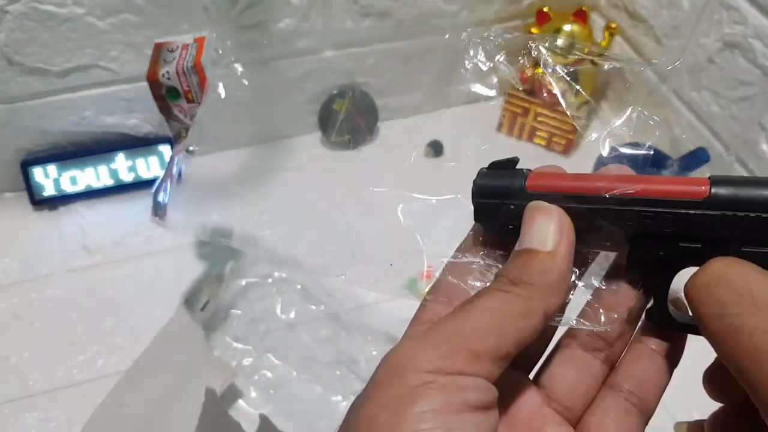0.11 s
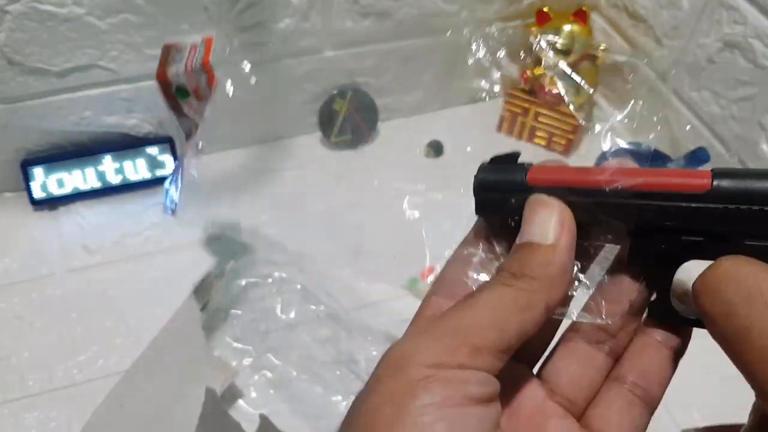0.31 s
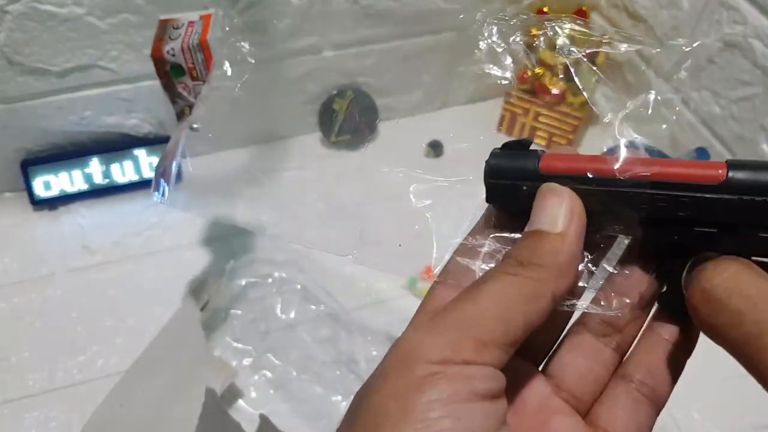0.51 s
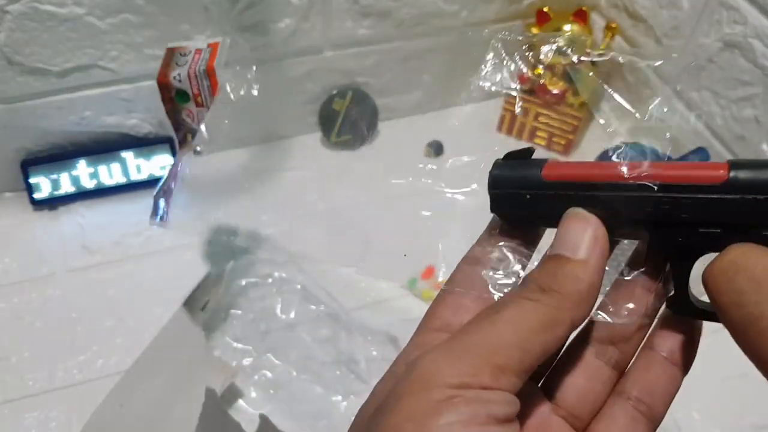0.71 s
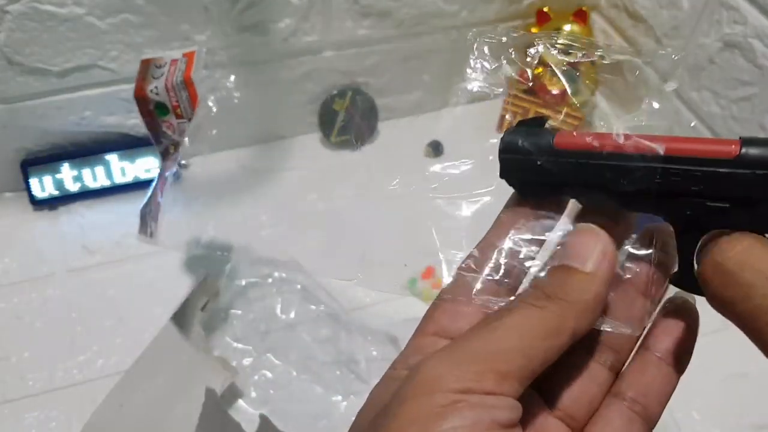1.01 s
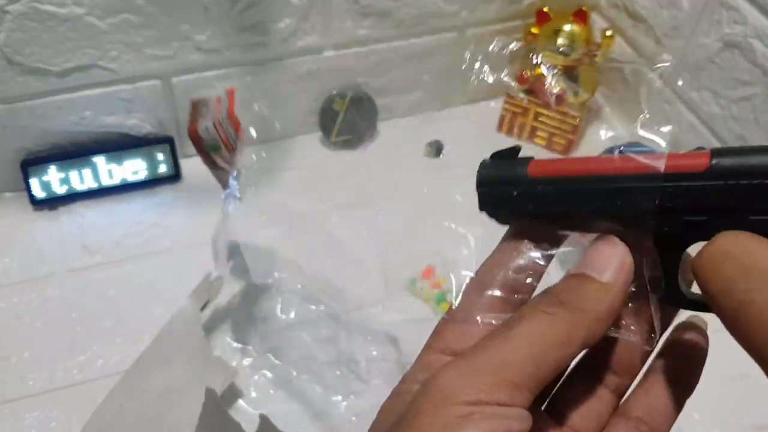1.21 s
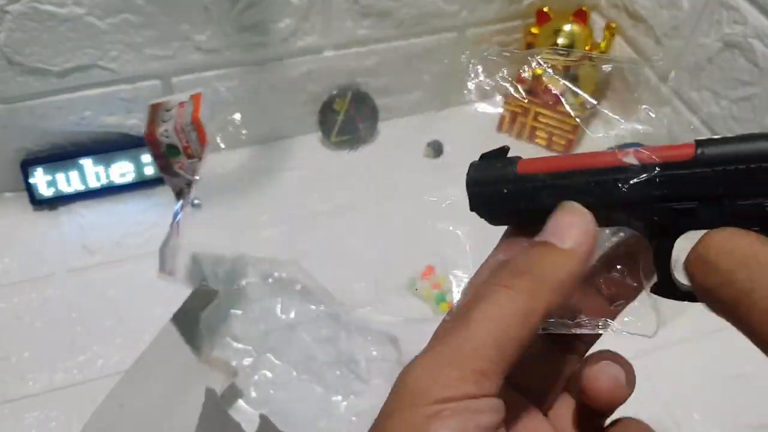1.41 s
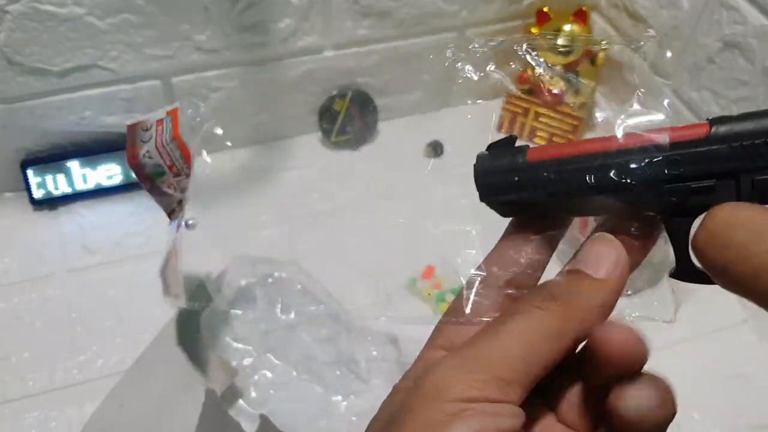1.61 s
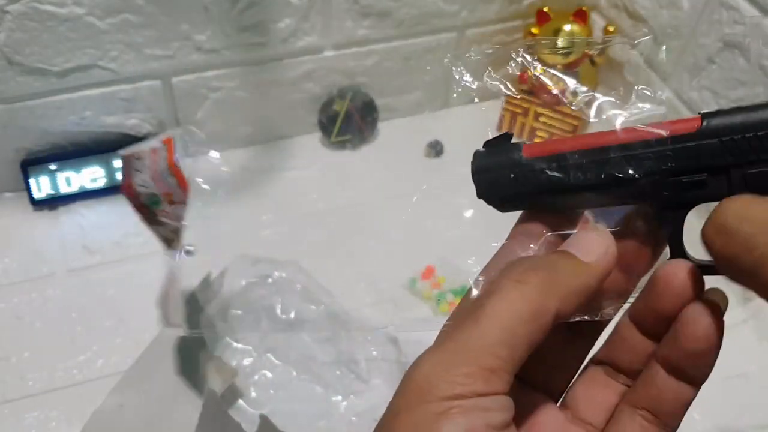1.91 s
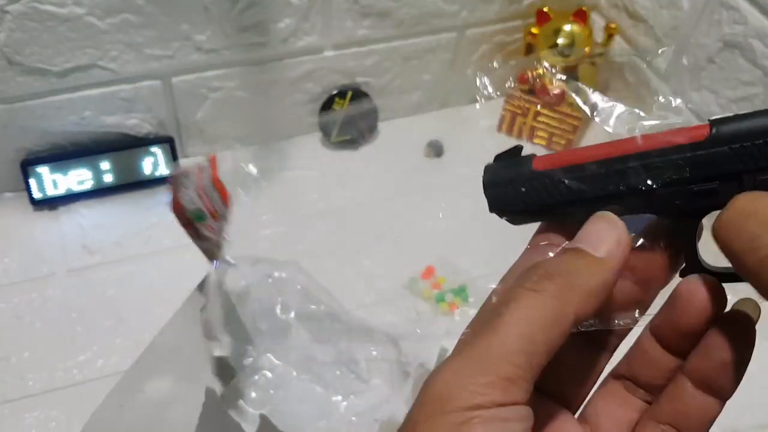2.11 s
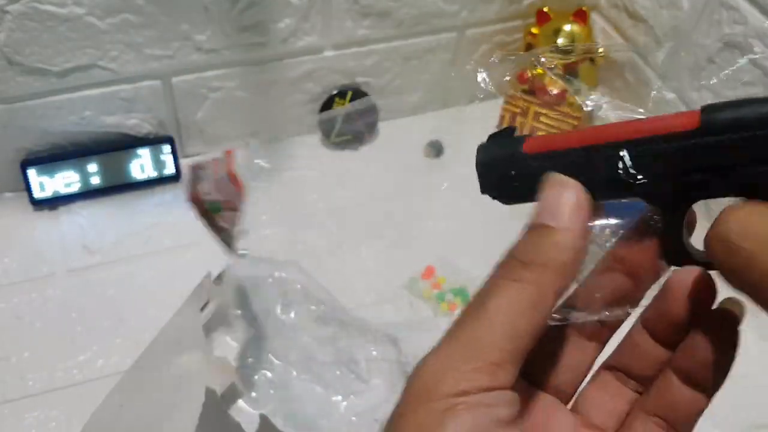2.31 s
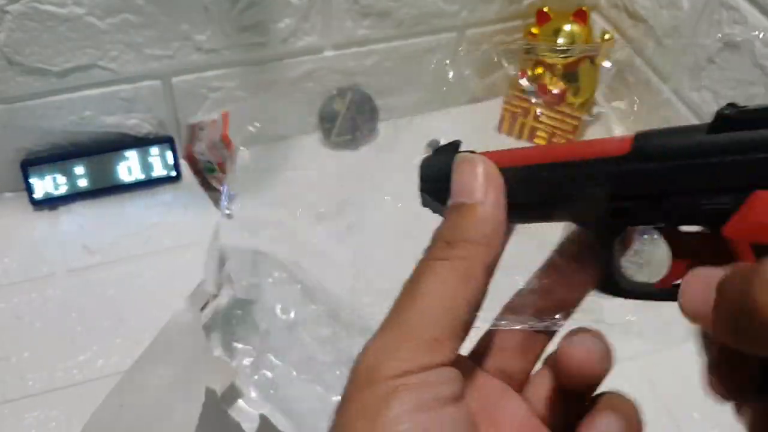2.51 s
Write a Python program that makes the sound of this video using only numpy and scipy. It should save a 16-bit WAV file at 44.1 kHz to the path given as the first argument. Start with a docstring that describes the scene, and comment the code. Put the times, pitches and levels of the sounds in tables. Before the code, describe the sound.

A toy pistol clicks sharply five times, with thin plastic film crinkling in between.

```python
"""Toy pistol, dry-fired in a small room

A small hard-walled room, a phone's two microphones close to a plastic toy pistol. Five pulls: each
releases a sprung striker whose crack briefly overloads the microphones, heard as a low thump,
and the trigger snaps back a moment later. In between, thin plastic film crinkles in the hand and
fingers knock on the shell, over a hush with a faint hum."""
import sys
import numpy as np
from scipy import signal
from scipy.fft import rfft, irfft, next_fast_len
from scipy.io import wavfile
from scipy.ndimage import uniform_filter1d, minimum_filter1d

SR = 44100
rng = np.random.default_rng(int(sys.argv[2]) if len(sys.argv) > 2 else 0)


def store_wav(level_fs):
    """Save 16-bit WAV to argv[1]."""
    pcm = np.round(np.clip(np.atleast_2d(level_fs), -1, 1) * 32767)
    wavfile.write(sys.argv[1], SR, pcm.T.astype(np.int16))


N = 119070

# modes of the plastic shell: f/Hz, t60/s, level/dB for striker, for trigger, for rub, left minus right/dB
SHELL_MODES = [(610, .017, -9, -10, -12, 5), (900, .015, -14, -11, -12, 3), (1560, .03, -2, 1, -1, 4),
               (2085, .027, 2, 1, 3, 5), (2270, .025, -4, -6, -8, 1), (2648, .033, -1, 4, -4, 0),
               (3180, .016, -1, -11, -8, -2), (3650, .014, -3, -7, -12, 3), (4250, .016, 0, -9, -12, 2),
               (5250, .018, 0, -10, -16, 0), (6300, .014, -3, -11, -20, 2), (7630, .014, -4, -20, -24, 2),
               (9600, .012, -3, -16, -26, 2), (10500, .012, -3, -20, -26, 2)]
BY_STRIKER, BY_TRIGGER, BY_RUB = 2, 3, 4  # its level columns
LEFT_LAG_SAMPLES = 7  # the pistol is nearer the right microphone
CLOSE_LIKENESS = 0.2  # left-right correlation of close noises
FILM_PAN_DB, LEAD_IN_S = 2, .005


def amp(db):
    return 10 ** (np.asarray(db) / 20)


def unit_rms(x):
    return x / np.sqrt(np.mean(x ** 2) + 1e-20)


def at_hz(points, hz):
    f, value = np.transpose(points)
    return np.interp(np.log(hz + 1), np.log(f + 1), value)


def over_time(points):
    t, value = np.transpose(points)
    return np.interp(np.arange(N) / SR, t, value)


def add(mix, s, sound):
    at = max(round(s * SR), 0)
    part = mix[..., at:at + sound.shape[-1]]
    part += sound[..., :part.shape[-1]]


def colour(x, db_of):
    """Filters by a gain in dB given as a function of Hz."""
    size = next_fast_len(x.shape[-1] + 2048)
    gain = amp(db_of(np.fft.rfftfreq(size, 1 / SR)))
    return irfft(rfft(x, size) * gain, size)[..., :x.shape[-1]]


def noise_pair(size, likeness=CLOSE_LIKENESS):
    """Left and right noises that share a part."""
    a, b = rng.standard_normal((2, size))
    return np.array([a, likeness * a + np.sqrt(1 - likeness ** 2) * b])


def pan(left_db):
    return amp(np.array([[left_db / 2], [-left_db / 2]]))


def room_tone():
    """A steady hush with a faint fuzzy hum, over a low rumble that sinks and comes back."""
    spectrum = [(12, -44), (20, -10), (91, 9), (216, -21.5), (248, -14.5), (485, -20), (718, -19.5),
                (873, -26.5), (2460, -16), (2820, -21), (3250, -20), (16000, -57.5)]  # the room's hush: f/Hz, level/dB
    likeness = [(60, 1), (240, 0.87), (950, 0.93), (3770, 0.045), (15000, 0.02)]  # how alike the microphones hear it: f/Hz, correlation
    balance = [(60, -4), (380, 4), (2380, 2.5), (15000, 1)]  # its lean to one side: f/Hz, left minus right/dB
    rumble_levels = [(0.0, -56), (0.14, -56), (0.46, -62), (0.82, -67), (1.01, -69.5), (1.59, -71.5),
                     (1.87, -71), (2.7, -63)]  # course of the rumble: t/s, level/dB
    size = next_fast_len(N)
    hz = np.fft.rfftfreq(size, 1 / SR)
    a, b = rfft(rng.standard_normal((2, size)))
    same, lean = at_hz(likeness, hz), amp(at_hz(balance, hz) / 2)
    air = np.array([a * lean, (same * a + np.sqrt(1 - same ** 2) * b) / lean])
    hum_db = 7 * np.exp(-.5 * ((hz - 487) / 9) ** 2)
    air *= amp(at_hz(spectrum, hz) + hum_db)
    lows = 1 / (1 + (hz / 220) ** 4)
    air_rms = np.sqrt(np.mean(irfft(air, size) ** 2))
    hush = amp(-47) * irfft(air * (1 - lows), size)[:, :N] / air_rms
    rumble = amp(over_time(rumble_levels)) * unit_rms(irfft(air * lows, size)[:, :N])
    return hush + rumble


def reflections(send):
    """Hard walls return a dense tail, coloured by the shell's modes; each band dies at its own speed."""
    decay = [(200, 0.37), (600, 0.21), (1500, 0.34), (4000, 0.29), (9000, 0.31), (14000, 0.31)]  # reverberation time: f/Hz, t60/s
    spectrum = [(60, -32), (150, -20), (700, -13.5), (1400, -7.5), (2500, -3), (4500, -3), (7000, -7),
                (11000, -9.5), (15500, -14)]  # colour of the tail: f/Hz, level/dB
    build_s, far_wall_s, wall_fade_s = .0048, .017, .0032
    out = np.zeros((2, N))
    turn = np.arange(N) * 7 // SR % 3  # three tails take turns, 1/7 s each
    for k in range(3):
        hz, t, bands = signal.stft(noise_pair(SR // 2, likeness=.067), SR, nperseg=512, noverlap=448)
        humps = sum(np.exp(-.5 * (np.log((hz + 1) / mode[0]) / .03) ** 2) for mode in SHELL_MODES)
        start_db = at_hz(spectrum, hz) + 3.5 * humps
        bands = bands * amp(start_db[:, None] - 60 * t / at_hz(decay, hz)[:, None])
        tail = signal.istft(bands, SR, nperseg=512, noverlap=448)[1]
        t = np.arange(tail.shape[1]) / SR
        far_wall = .73 * (t > far_wall_s) * np.exp(-(t - far_wall_s) / wall_fade_s)
        tail *= np.minimum(t / build_s, 1) ** 2 + far_wall
        tail /= 3 * abs(tail[:, :1000]).mean()
        out += signal.fftconvolve((send * (turn == k))[None], tail, axes=1)[:, :N]
    return out * pan(1.9)


def film_rustle():
    """Many tiny creases of uneven size give way under the fingers."""
    handling = [(0.0, -54), (0.13, -52), (0.4, -62), (0.54, -109), (0.73, -57), (0.85, -38.5), (1.16, -73),
                (1.41, -68), (1.62, -44.5), (1.87, -72), (2.01, -39.5), (2.22, -91), (2.36, -42),
                (2.7, -44)]  # how hard the film is worked: t/s, level/dB
    spectrum = [(120, -10), (200, -16), (322, 4), (519, -55), (683, -2), (1500, -7), (1680, -5),
                (9930, -18.5), (14900, -50), (16000, -7)]  # colour of the rustle: f/Hz, level/dB
    creases_per_s, grain_s, spread_db = 350, .0091, 5.5
    sizes = amp(spread_db * np.minimum(rng.exponential(1, N), 4))
    creases = sizes * (rng.random(N) < creases_per_s / SR)
    power = signal.lfilter([1], [1, -np.exp(-2 / (grain_s * SR))], creases ** 2)
    hiss = colour(noise_pair(N), lambda hz: at_hz(spectrum, hz))
    return pan(FILM_PAN_DB) * amp(over_time(handling) - 6) * unit_rms(hiss * np.sqrt(abs(power)))


def film_crinkles():
    """Creases snap as dying bursts with a broad peak and a wide spray; returns direct sound, room send."""
    snaps = [(0.107, -46.5, 1400, 0.0029), (0.408, -34, 2080, 0.0087), (0.4155, -34, 1890, 0.0019),
             (0.437, -47, 2020, 0.0054), (0.63, -43, 2400, 0.0036), (0.636, -61, 1300, 0.0022),
             (0.66, -62, 1800, 0.0018), (0.669, -50, 3950, 0.002), (0.678, -46, 1760, 0.0039),
             (0.7153, -39, 1500, 0.0033), (0.718, -36, 1770, 0.0058), (0.731, -46, 1800, 0.008),
             (0.737, -57, 2000, 0.0026), (0.765, -34, 1570, 0.00037), (0.777, -37, 2400, 0.0014),
             (0.798, -41.5, 3470, 0.0024), (0.93, -37, 2980, 0.0056), (0.98, -43.5, 1530, 0.0016),
             (1.065, -41.5, 2760, 0.0067), (1.08, -43, 3000, 0.0025), (1.154, -37, 2450, 0.0015),
             (1.166, -39.0, 1660, 0.0022), (1.1916, -41, 2220, 0.013), (1.21, -44, 2470, 0.023),
             (1.2215, -29.5, 1700, 0.00088), (1.2356, -41, 3870, 0.011), (1.248, -34.5, 1400, 0.0027),
             (1.267, -44.5, 1380, 0.0074), (1.292, -49, 4000, 0.0016), (1.4656, -41, 3050, 0.0039),
             (1.5824, -42.5, 1330, 0.025), (1.591, -34.5, 2150, 0.0076), (1.602, -40, 1730, 0.0028),
             (1.649, -40, 1740, 0.0023), (1.676, -40.5, 1200, 0.0021), (1.7095, -41, 2200, 0.012),
             (1.7316, -42, 1540, 0.016), (1.7442, -30, 2440, 0.0012), (1.78, -39, 1640, 0.0085),
             (1.798, -39.5, 2250, 0.0033), (1.934, -32, 1850, 0.0027), (2.116, -45.5, 2980, 0.0034),
             (2.141, -40.5, 2030, 0.0075), (2.166, -38, 1710, 0.0021), (2.327, -38.5, 695, 0.0045),
             (2.474, -45, 1230, 0.008), (2.486, -41.5, 2440, 0.0081), (2.503, -39, 2000, 0.0067),
             (2.558, -32.5, 1190, 0.0004), (2.572, -39.5, 1740, 0.0028), (2.581, -36.5, 4260, 0.0034),
             (2.612, -43, 740, 0.0018), (2.6268, -41, 1000, 0.018), (2.639, -36.5, 1820, 0.0076),
             (2.65, -33, 1240, 0.0051), (2.662, -32, 1240, 0.0033), (2.692, -36.5, 1820, 0.0017)]  # single creases: t/s, level/dB, centre f/Hz, decay/s
    near, send, t = np.zeros((2, N)), np.zeros(N), np.arange(1500) / SR
    for s, db, centre_hz, decay_s in snaps:
        reach_hz = 5000 * amp((db + 38) * .74)  # harder creases reach higher

        def spectrum_db(hz):
            peak = np.exp(-np.log2((hz + 1) / centre_hz) ** 2)
            spray = (amp(-5.5) * hz / (hz + 600)) ** 2 / (1 + (hz / reach_hz) ** 2)
            return 10 * np.log10(peak + spray + 1e-9)

        burst = unit_rms(colour(noise_pair(len(t)), spectrum_db)) * np.exp(-t / max(decay_s, .0005))
        add(near, s, pan(FILM_PAN_DB) * amp(db) * burst)
        add(send, s, amp(db - 20.5) * np.ones(1))
    return near, send


def finger_knocks():
    """Fingers bump the shell: soft-edged, quickly damped low tones."""
    knocks = [(0.41, -52, 274), (0.717, -33.5, 286), (0.927, -40, 312), (1.588, -48, 262),
              (1.954, -29.5, 288), (2.028, -40, 440), (2.148, -42, 260), (2.431, -30, 312),
              (2.61, -27.5, 330), (2.647, -26, 267), (2.662, -31, 426)]  # dull bumps: t/s, level/dB, f/Hz
    attack_s, t60 = .0054, .021
    out, t = np.zeros((2, N)), np.arange(2500) / SR
    for s, db, hz in knocks:
        envelope = amp(db - 60 * t / t60) * np.minimum(t / attack_s, 1)
        add(out, s, pan(.9) * envelope * np.sin(2 * np.pi * hz * t))
    return out


def shell_ring(column):
    """The shell's damped modes after one touch, at both microphones."""
    t = np.arange(3000) / SR
    ring = np.zeros((2, len(t)))
    for mode in SHELL_MODES:
        hz, t60, *_, left_db = mode
        envelope = amp(mode[column] - 60 * t / t60) / np.sqrt(t60)
        ring += pan(left_db) * envelope * np.sin(2 * np.pi * hz * t)
    return ring / np.linalg.norm(ring) * np.sqrt(2)


def trigger_rubs():
    """Gritty friction rings the shell while the trigger slides in its guide."""
    rubs = [(.028, 0.062, -56.5), (0.099, 0.0032, -48.5), (0.145, 0.003, -48.5), (0.448, 0.0061, -50.5),
            (0.594, 0.0029, -76), (0.616, .013, -51.5), (0.681, 0.06, -56.5), (2.145, 0.0055, -44),
            (2.166, 0.00586, -48.5)]  # drags and ticks: t/s, length/s, level/dB
    drag, grit_db = np.zeros(N), 4
    for s, length_s, db in rubs:
        grit, friction = rng.standard_normal((4000, 2))[:round(length_s * SR)].T
        add(drag, s, amp(db + grit_db * grit) * friction)
    return signal.fftconvolve(drag[None], shell_ring(BY_RUB), axes=1)[:, :N]


def overload_thumps():
    """Each loud crack briefly overloads the microphones, heard as a low thump with a slow rebound."""
    thumps = [(.2382, .06, 0), (.2408, .17, 0), (.2420, -.37, -.03), (.8122, 0, -.18), (.8127, -.18, 0),
              (1.3099, .23, 0), (1.3112, -.13, -.15), (1.8245, -.33, .04), (2.2172, .01, -.045),
              (2.2185, -.06, -.025)]  # overload thumps: t/s, left height, right height
    pulse_width_s, rebound_delay_s, rebound_width_s = .00055, .004, .0018
    out, t = np.zeros((2, N)), np.arange(3000) / SR - 3 * pulse_width_s
    pulse = np.exp(-.5 * (t / pulse_width_s) ** 2)
    rebound = .36 * np.exp(-.5 * ((t - rebound_delay_s) / rebound_width_s) ** 2)
    for s, left, right in thumps:
        add(out, s - 3 * pulse_width_s, np.outer([left, right], pulse - rebound))
    return out


def barrel_ring(ring_db):
    """One touch, then the hollow barrel's short ring."""
    modes = [(4150, .008, 0), (5230, .008, 1)]  # barrel resonances: f/Hz, t60/s, level/dB
    t = np.arange(800) / SR
    ring = sum(amp(ring_db + db - 60 * t / t60) * np.sin(2 * np.pi * hz * t) for hz, t60, db in modes)
    return (t == 0) + ring


def impact(db, tilt_db, column, contacts, chatter_s, rattle_share, crack_colour, crack_db, ring_lag):
    """Firm contacts and a rattle of parts crack and ring the shell; the blow falls LEAD_IN_S in."""
    t = np.arange(3000) / SR - LEAD_IN_S
    scrape = amp(-9) * np.exp(np.minimum(t, 0) / .0013)  # swells in ahead of the blow
    envelope = np.where(t < 0, scrape, np.exp(-np.maximum(t, 0) / chatter_s))
    knock = sum(force * (abs(t - delay_s) <= .5 / SR) for delay_s, force in contacts)
    rattle = unit_rms(noise_pair(len(t)) * amp(2 * rng.standard_normal(len(t)))) * envelope
    ring = signal.fftconvolve(rattle_share * rattle + knock, shell_ring(column), axes=1)[:, :len(t)]
    # the broad shell reaches the left microphone before the crack, only ring_lag samples late
    ring[0] = np.roll(ring[0], ring_lag - LEFT_LAG_SAMPLES)
    crack = colour(rattle + .21 * knock, lambda hz: crack_db + at_hz(crack_colour, hz))
    return amp(db - 5) * colour(ring + crack, lambda hz: tilt_db * np.log2((hz + 500) / 4000))


def trigger_snaps():
    """The trigger snaps back, bouncing the same way each time; returns direct sound, room send."""
    snaps = [(0.4779, -11, 4.8), (1.033, -14.5, 5.5), (1.5202, -13.5, 5), (2.0146, -13.5, 4.3),
             (2.4119, -14, 4.06)]  # trigger returns: t/s, level/dB, treble tilt/(dB per octave)
    bounces = [(.0002, 3), (.0021, -9)]  # contacts in each return: delay/s, signed strength
    spectrum = [(240, -55), (400, -84), (2800, 8), (6440, -2.5), (11600, -27), (12900, -18.5), (16000, -20)]  # colour of the bare contact: f/Hz, level/dB
    near, send = np.zeros((2, N)), np.zeros(N)
    for s, db, tilt_db in snaps:
        snap = impact(db, tilt_db, BY_TRIGGER, contacts=bounces, chatter_s=.0024, rattle_share=.2,
                      crack_colour=spectrum, crack_db=0, ring_lag=4)
        add(near, s - LEAD_IN_S, snap)
        add(send, s, amp(db - 28) * np.ones(1))
    return near, send


def striker_blows():
    """The sprung striker lands, ringing shell and barrel; returns direct sound, room send."""
    # shots: t/s, level/dB, treble tilt/(dB per octave), relative room send/dB, barrel ring/dB
    shots = [(0.2397, -10, 1.5, -1.5, -28.5), (0.8105, -7.5, 1.5, -11, -55), (1.3097, -8, 1.5, -13, -67),
             (1.823, -8, 0.9, -12.5, -64), (2.2159, -7.5, 3, -13.5, -53)]
    spectrum = [(410, -32), (700, -32), (2220, 3.5), (7010, 0.5), (9600, -1), (14800, -6), (16000, -24)]  # colour of the bare contact: f/Hz, level/dB
    near, send = np.zeros((2, N)), np.zeros(N)
    for s, db, tilt_db, room_db, barrel_db in shots:
        blow = impact(db, tilt_db, BY_STRIKER, contacts=[(.0012, 6.5)], chatter_s=.0043,
                      rattle_share=.45, crack_colour=spectrum, crack_db=4.5, ring_lag=1)
        barrel = barrel_ring(barrel_db)
        add(near, s - LEAD_IN_S, signal.fftconvolve(blow, barrel[None], axes=1))
        add(send, s, amp(db + room_db) * barrel)
    return near, send


def scene():
    """Pistol and film close to the microphones, the room behind them."""
    blows, blow_send = striker_blows()
    snaps, snap_send = trigger_snaps()
    crinkles, crinkle_send = film_crinkles()
    near = blows + snaps + crinkles + film_rustle()
    near[0] = np.roll(near[0], LEFT_LAG_SAMPLES)
    near += trigger_rubs() + overload_thumps() + finger_knocks()
    return near + reflections(blow_send + snap_send + crinkle_send) + room_tone()


def record(dry):
    """The phone's look-ahead gain control dips just before a sudden rise; hard ceiling; band limit."""
    look, threshold_db, dip_share, edge_hz = round(.015 * SR), 5.5, .41, 15500
    power = uniform_filter1d((dry ** 2).mean(0), 60)
    power_db = 10 * np.log10(abs(power) + 1e-12)
    ahead_db = -minimum_filter1d(-power_db, look, origin=-(look // 2))
    dip_db = dip_share * uniform_filter1d(np.maximum(ahead_db - power_db - threshold_db, 0), 60)
    clipped = np.clip(dry / amp(dip_db), -1, 1)
    lowpass = signal.firwin(255, edge_hz, window=("kaiser", 9), fs=SR)
    return np.clip(signal.oaconvolve(clipped, lowpass[None], "same"), -1, 1)


dry = scene()
out = record(dry)
store_wav(out)
```